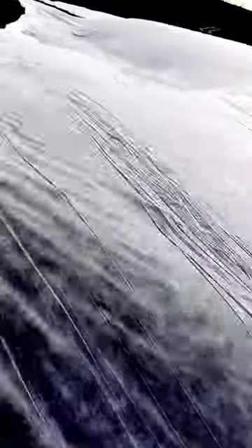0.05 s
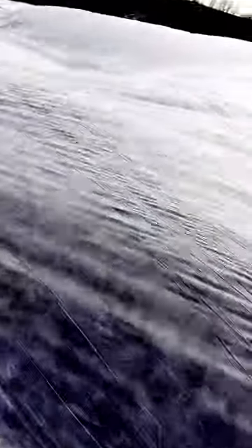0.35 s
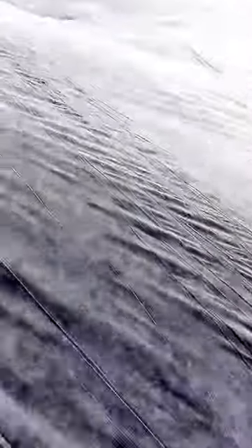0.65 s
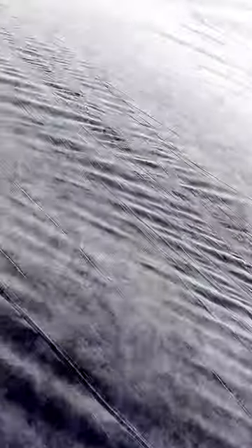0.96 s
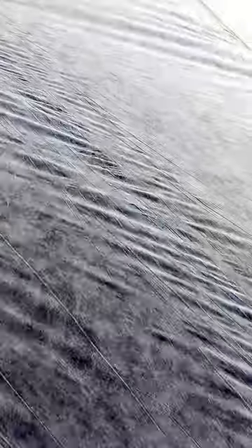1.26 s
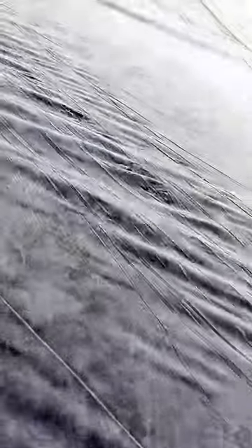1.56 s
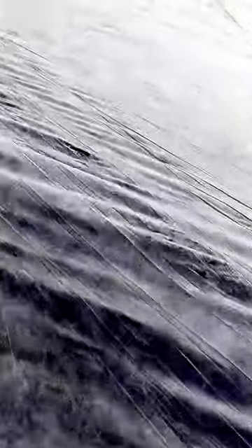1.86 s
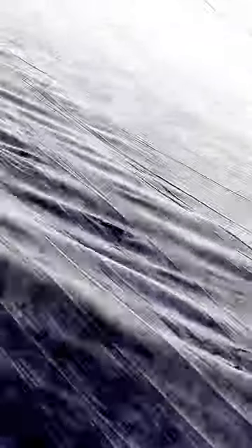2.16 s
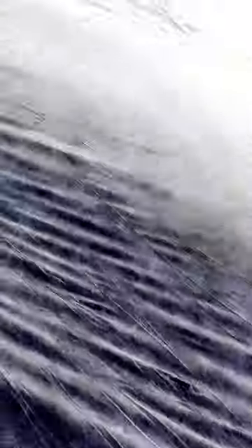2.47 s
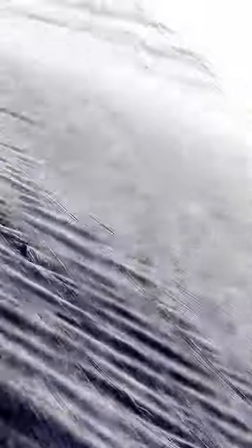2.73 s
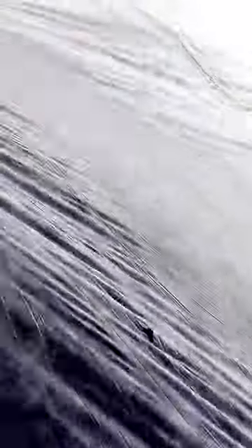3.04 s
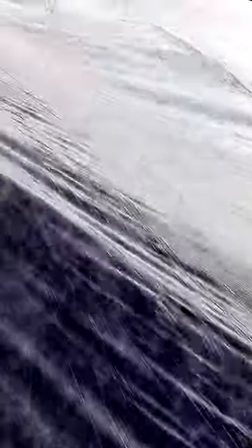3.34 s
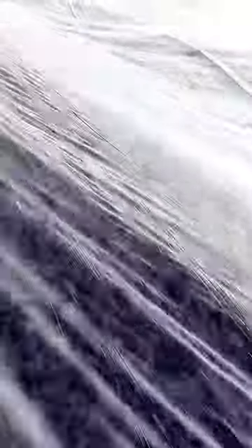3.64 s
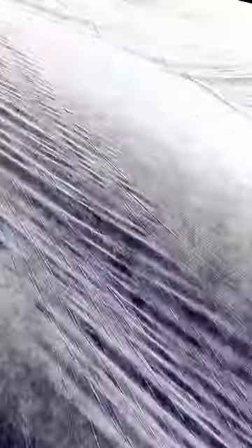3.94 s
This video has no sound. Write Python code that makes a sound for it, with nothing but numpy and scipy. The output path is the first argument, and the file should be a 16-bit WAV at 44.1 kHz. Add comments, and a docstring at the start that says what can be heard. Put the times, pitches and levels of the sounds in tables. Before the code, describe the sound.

Wind rumbles low and unevenly on the microphone for all four seconds, while a large, light fabric sheet billows close by outdoors. The cloth crumples faintly around 0.7 seconds and swishes briefly at 1.5. From there the gusts grow stronger, with short flutters and dull thumps near 1.7, 2.3 to 2.7 and 3 seconds. The loudest thump comes at about 3.6 seconds, over a very faint rustle and hiss.

```python
"""A low rumble of wind comes first, with a large, light sheet billowing close by, outdoors.
The rumble is swirling air pressing on the microphone. The wind shakes the cloth in short flurries,
and the sheet thumps as it fills and pushes the air. Now and then its folds crumple, or slide over
each other and swish. Behind it all lie a soft rustle, a faint hiss and a very faint low whistle."""
import sys
import numpy as np
from scipy import signal
from scipy.fft import rfft, irfft
from scipy.io import wavfile
from scipy.ndimage import uniform_filter1d

SR = 44100
rng = np.random.default_rng(int(sys.argv[2]) if len(sys.argv) > 2 else 0)


def store_pcm(level_fs):
    """Save levels as 16-bit WAV."""
    pcm = np.round(np.clip(level_fs, -1, 1) * 32767).astype(np.int16)
    wavfile.write(sys.argv[1], SR, np.atleast_2d(pcm).T)


N = 176400

# how hard the wind presses on the microphone: t/s, relative level/dB
WIND_LEVEL = [(0.02, -33), (0.11, -42), (0.19, -34), (0.25, -48.5), (0.37, -40.5), (0.46, -52.5),
              (0.56, -38.5), (0.61, -46), (0.64, -37.5), (0.93, -47.5), (1.02, -32.5), (1.21, -47.5),
              (1.46, -36.5), (1.5, -51), (1.57, -32), (1.62, -40.5), (1.65, -28), (1.77, -41.5),
              (1.85, -26), (1.94, -42.5), (1.98, -29), (2.09, -57.5), (2.15, -56), (2.18, -28.5),
              (2.24, -46), (2.25, -34.5), (2.36, -31.5), (2.38, -44), (2.41, -35), (2.54, -27.5),
              (2.59, -35), (2.62, -31), (2.69, -36.5), (2.73, -40.5), (2.84, -35.5), (2.97, -34.5),
              (3.04, -41), (3.09, -28), (3.15, -37), (3.19, -28), (3.21, -36), (3.26, -34), (3.29, -39.5),
              (3.31, -35.5), (3.4, -28.5), (3.45, -45), (3.51, -25), (3.56, -43.5), (3.62, -21),
              (3.67, -29.5), (3.7, -32), (3.72, -29.5), (3.88, -31.5), (3.92, -39), (3.96, -27.5)]
# tone (how strong each frequency is) of slow swirls, puffs and shaking cloth: f/Hz, relative level/dB
RUMBLE_TONE = [(10, 8.5), (22, -3), (45, 2), (70, -4), (100, -11.5), (150, -24), (220, -51.5), (400, -61.5)]
PUFF_TONE = [(40, -14), (70, -6), (110, 10), (160, -12.5), (220, -12.5), (320, -48.5), (500, -78)]
FLUTTER_TONE = [(30, -29.5), (60, -5), (110, 11), (160, -5), (230, -10), (320, -12.5), (450, -28.5),
                (700, -50), (1500, -83)]
# flurries shake the cloth: peak t/s, rise t/s, fall t/s, relative level/dB, flap pitch f/Hz
WIND_FLURRIES = [(0.111, 0.023, 0.013, -42, 109), (0.364, 0.028, 0.052, -49.5, 134),
                 (0.701, 0.0092, 0.042, -50, 122), (1.0, 0.027, 0.072, -47.5, 104),
                 (1.445, 0.012, 0.016, -34.5, 105), (1.571, 0.034, 0.02, -36.5, 102),
                 (1.68, 0.077, 0.059, -37, 98), (1.852, 0.015, 0.037, -29, 83),
                 (1.976, 0.0069, 0.02, -40, 125), (2.265, 0.06, 0.039, -40, 112),
                 (2.476, 0.033, 0.039, -31.5, 105), (2.58, 0.064, 0.07, -32.5, 116),
                 (2.86, 0.036, 0.036, -44, 81), (3.185, 0.006, 0.031, -42.5, 82),
                 (3.258, 0.0095, 0.014, -31.5, 110), (3.326, 0.016, 0.026, -31, 140),
                 (3.384, 0.0074, 0.013, -34, 119), (3.639, 0.031, 0.055, -26, 108),
                 (3.719, 0.092, 0.069, -32, 108), (3.878, 0.013, 0.019, -28, 103),
                 (3.97, 0.063, 0.04, -36.5, 88)]
# the sheet fills: t/s, peak level/dB, pitch f/Hz
SHEET_THUMPS = [(0.094, -37.5, 232), (0.253, -44.5, 240), (1.065, -27.5, 44.7), (1.124, -32.5, 102),
                (1.182, -34, 93), (1.668, -22, 104), (1.689, -23.5, 128), (1.71, -24, 121),
                (1.731, -37, 235), (1.835, -28, 170), (1.849, -30, 114), (1.971, -44, 200),
                (2.26, -22.5, 79), (2.365, -44, 182), (2.463, -22, 100), (2.54, -27.5, 125),
                (2.68, -24.5, 120), (2.987, -21.5, 71), (3.231, -47, 240), (3.313, -43, 198),
                (3.333, -51, 260), (3.387, -25.5, 109), (3.613, -29, 45), (3.635, -13, 116.6),
                (3.875, -38.5, 203)]
# folds crumple: peak t/s, rise t/s, fall t/s, relative level/dB, upper edge f/Hz
FOLD_CRUMPLES = [(0.09, 0.0024, 0.042, -56, 1690), (0.53, 0.0066, 0.007, -58, 2220),
                 (.697, 0.0069, 0.011, -55.5, 2200), (0.725, 0.0013, 0.0074, -46, 1160),
                 (0.748, 0.0016, 0.01, -47, 1320), (0.771, 0.018, 0.022, -45.5, 4360),
                 (1.235, 0.013, 0.014, -61, 1200), (1.452, 0.0012, 0.0079, -46, 468),
                 (1.505, 0.0045, 0.02, -53, 795), (2.52, 0.013, 0.01, -59, 3000),
                 (3.644, 0.012, 0.0092, -54, 600)]
# cloth slides over cloth: peak t/s, rise t/s, fall t/s, relative level/dB, zip f/Hz
CLOTH_SWISHES = [(0.098, 0.043, 0.054, -75, 3620), (0.692, 0.004, 0.0096, -64.5, 5430),
                 (1.053, 0.0026, 0.0065, -72.5, 3600), (1.517, 0.0089, 0.021, -49.5, 3440),
                 (1.532, 0.006, 0.024, -64, 2920), (2.312, 0.003, 0.0067, -72, 4200),
                 (3.641, 0.0026, 0.0035, -66.5, 3860), (3.959, .001, 0.0075, -71.5, 5200),
                 (3.994, 0.012, 0.033, -58.5, 4750)]
# tight cloth brushes lightly: peak t/s, rise and fall t/s, level/dB
CLOTH_BRUSHES = [(.525, 0.011, -71.5), (.68, 0.028, -72), (2.185, 0.033, -71.5), (3.579, 0.02, -71.5),
                 (3.711, 0.011, -69.5)]
# tone of crumpling, swishing and brushing cloth: f/Hz, relative level/dB
CRUMPLE_TONE = [(100, 12.5), (220, 5), (480, 0), (750, -2.5), (1100, -0.5), (1500, -4), (2100, -8),
                (3000, -15), (4500, -18.5), (7000, -23), (12000, -38)]
SWISH_TONE = [(300, 11.5), (600, -9.5), (1150, -15.5), (1450, 1), (2050, 2.5), (2900, 4), (4200, 1),
              (5500, -2.5), (7500, -8), (8600, -24), (14000, -30)]
BRUSH_TONE = [(1200, -1.5), (3200, -1.5), (8500, -5), (13000, -14)]
# tight cloth rubs: peak t/s, rise t/s, fall t/s, level/dB, pitch f/Hz
CLOTH_RUBS = [(.32, 0.047, 0.08, -73, 1260), (.32, 0.13, 0.1, -66, 328), (.5, 0.1, 0.076, -75.5, 1320),
              (2.22, 0.017, 0.013, -72.5, 1480), (2.412, 0.0057, 0.012, -74, 5160),
              (2.52, 0.018, 0.014, -73, 1370), (3.415, 0.0086, 0.013, -45.5, 308),
              (3.44, 0.08, .06, -76, 1150), (3.725, 0.02, 0.032, -68.5, 1133),
              (3.82, 0.011, 0.024, -72.5, 4450)]
# how loud the far cloth and the rippling surface are: t/s, level/dB
FAR_CLOTH_LEVEL = [(0, -76.5), (.33, -69.5), (.5, -74), (.62, -77), (.85, -75), (1.0, -81.5), (1.3, -76),
                   (1.68, -69.5), (2.0, -78.5), (2.22, -73.5), (2.35, -79.5), (2.5, -74), (2.7, -78),
                   (3.2, -85), (3.42, -70), (3.55, -75), (3.75, -73), (4, -81.5)]
SURFACE_LEVEL = [(0, -78), (.6, -78), (1.0, -78.5), (1.35, -75), (1.7, -75.5), (2.0, -80.5), (2.25, -77.5),
                 (2.7, -82.5), (2.8, -74.5), (2.92, -78.5), (3.3, -80.5), (4, -80.5)]
# tone of the far cloth, the rippling surface and the outdoor hiss: f/Hz, relative level/dB
FAR_CLOTH_TONE = [(200, 1), (380, -0.5), (600, -8), (900, -5.5), (1250, -8), (1800, -8), (2400, -19),
                  (5000, -40), (10000, -63)]
SURFACE_TONE = [(800, -7), (2000, -6.5), (3300, 0.5), (5000, -3), (7300, -6.5), (9000, -11.5), (14000, -28)]
AIR_TONE = [(100, 10), (300, -2.5), (550, -0.5), (1000, 11.5), (1700, 6.5), (3000, -1), (6000, 0),
            (9000, -1.5), (14000, -1.5)]
# a low whistle comes and goes: peak t/s, rise t/s, fall t/s, level/dB, pitch f/Hz
FAINT_WHISTLES = [(.98, 0.057, 0.074, -82.5, 559), (1.339, 0.071, 0.11, -81.5, 549)]

RUMBLE_DB, PUFF_DB, FLUTTER_DB, AIR_DB = 0.5, -22, -10, -75.5
RUMBLE_STEADY_S, FLUTTER_STEADY_S = 0.035, 0.055
FLAPS_PER_S, FLAP_DB, FLAP_SPREAD_DB, FLAP_SPREAD_OCTAVES = 94, 1, 0.5, 0.38
THREADS_PER_S, THREAD_SPREAD_DB = 9000, 2


def wind():
    """Slow swirls of air press on the microphone; each crest of pressure sheds a puff of faster ones."""
    slow = swirls(RUMBLE_TONE, RUMBLE_STEADY_S)
    puffs = swirls(PUFF_TONE, FLUTTER_STEADY_S) * power_of(slow) * gain(PUFF_DB)
    return (slow + puffs) * level_curve(WIND_LEVEL) * gain(RUMBLE_DB)


def flutter():
    """Fast swirls of air make each flurry sound rough."""
    power = sum((gain(db) * swell(at, rise, fall, shape=2)) ** 2
                for at, rise, fall, db, _ in WIND_FLURRIES)
    return swirls(FLUTTER_TONE, FLUTTER_STEADY_S) * np.sqrt(power) * gain(FLUTTER_DB)


def flaps(count=32):
    """In each flurry the cloth flaps to and fro at uneven times, no two flaps alike."""
    out = np.zeros(N)
    chance = rng.uniform(-0.903, 1, (len(WIND_FLURRIES), count, 3))
    for (at, rise, fall, db, hz), draws in zip(WIND_FLURRIES, chance):
        for k, (late, soft, tight) in enumerate(draws):
            offset = (k - count // 2 + late / 2) / FLAPS_PER_S
            from_peak = abs(offset) / (rise if offset < 0 else fall)
            if from_peak < 2:
                strength = gain(db + FLAP_DB - FLAP_SPREAD_DB * soft) * np.exp(-from_peak ** 2)
                pitch = hz * 2 ** (FLAP_SPREAD_OCTAVES * tight)
                out += (-1) ** k * strength * push(at + offset, pitch)  # the sign flips: to, then fro
    return out


def thumps():
    """Each time the sheet fills, it sends out one strong push of air."""
    return sum(gain(db) * push(at, hz) for at, db, hz in SHEET_THUMPS)


def crumples():
    """Creases buckle in quick showers of clicks, duller where the fold is slack."""
    creases = with_tone(clicks(per_s=3200, spread_db=4.5), CRUMPLE_TONE)
    out = np.zeros(N)
    for at, rise, fall, db, hz in FOLD_CRUMPLES:
        dulled = signal.sosfilt(signal.butter(2, hz, fs=SR, output="sos"), creases)
        out += gain(db) * swell(at, rise, fall, shape=1) * dulled
    return out


def swishes(zip_db=-4):
    """Threads slip over each other: a broad hiss, with a narrow zip while the slide is fastest."""
    hiss = with_tone(clicks(THREADS_PER_S, THREAD_SPREAD_DB), SWISH_TONE)
    out = np.zeros(N)
    for at, rise, fall, db, hz in CLOTH_SWISHES:
        speed = swell(at, rise, fall, shape=1)
        zipping = speed * gain(zip_db) * ring(hiss, hz, width_hz=280)
        out += gain(db) * speed * (hiss + zipping)
    return out


def brushes():
    """Tight cloth brushes lightly, and its slipping threads make a short, airy hiss."""
    speed = sum(gain(db) * swell(at, length, length, shape=1) for at, length, db in CLOTH_BRUSHES)
    return with_tone(clicks(THREADS_PER_S, THREAD_SPREAD_DB), BRUSH_TONE) * speed


def rubs(sharpness=5.5):
    """Slower slides of the weave make a narrow band of noise with a faint pitch."""
    slips = clicks(THREADS_PER_S, THREAD_SPREAD_DB)
    out = np.zeros(N)
    for at, rise, fall, db, hz in CLOTH_RUBS:
        width_hz = hz / sharpness
        band = ring(ring(slips, hz, width_hz), hz, width_hz)
        out += gain(db) * swell(at, rise, fall, shape=2) * band
    return out


def rustle(flicker_db=0.8):
    """The rest of the sheet stirs softly while ripples run over it; the level flickers a little."""
    far = with_tone(clicks(per_s=3000, spread_db=0.5), FAR_CLOTH_TONE) * level_curve(FAR_CLOTH_LEVEL)
    ripples = with_tone(clicks(per_s=3000, spread_db=0.5), SURFACE_TONE) * level_curve(SURFACE_LEVEL)
    return (far + ripples) * gain(flicker_db * wander(per_s=30.05))


def outdoor_air():
    """A steady outdoor hiss, in which a very faint whistle comes and goes."""
    hiss = with_tone(rng.standard_normal(N), AIR_TONE) * gain(AIR_DB)
    whistle = np.zeros(N)
    for at, rise, fall, db, hz in FAINT_WHISTLES:
        note = np.sqrt(2) * np.sin(2 * np.pi * hz * clock())
        whistle += gain(db) * swell(at, rise, fall, shape=2) * note
    return hiss + whistle


def gain(db):
    """Turn decibels into a number to multiply a sound by."""
    return 10 ** (np.asarray(db) / 20)


def clock():
    """The time of each sample in seconds."""
    return np.arange(N) / SR


def level_curve(points):
    """A gain that glides between (t/s, level/dB) points."""
    return gain(np.interp(clock(), *np.array(points).T))


def with_tone(sound, tone):
    """Shape a sound by (f/Hz, level/dB) points; its average strength (rms) comes out as 1."""
    hz, db = np.array(tone).T
    f = np.maximum(np.arange(N // 2 + 1) * SR / N, 1)
    gains = gain(np.interp(np.log(f), np.log(hz), db))
    fade_past_ends = np.minimum(f / hz[0], 1) * np.minimum(hz[-1] / f, 1) ** 2
    shaped = irfft(rfft(sound) * gains * fade_past_ends, N)
    return shaped / np.std(shaped)


def power_of(sound):
    """How much power a sound has from moment to moment."""
    return abs(signal.hilbert(sound)) ** 2 / 2


def swirls(tone, steady_s):
    """The pressure of swirling air, kept even in strength over spans longer than steady_s."""
    pressure = with_tone(rng.standard_normal(N), tone)
    return pressure / np.sqrt(smooth(power_of(pressure), int(steady_s * SR)))


def smooth(values, samples):
    """Round off quick changes by averaging neighbours, twice."""
    return uniform_filter1d(uniform_filter1d(values, samples), samples)


def clicks(per_s, spread_db):
    """Tiny clicks at random times and of uneven size."""
    ticks = (rng.random(N) < per_s / SR) * rng.choice([-1, 1], N)
    return ticks * gain(spread_db * np.clip(rng.standard_normal(N), -2, 2))


def wander(per_s):
    """A smooth random drift, mostly between -1 and 1."""
    hold = int(SR / per_s)
    steps = np.repeat(rng.standard_normal(N // hold + 1), hold)
    return np.sqrt(2) * smooth(steps, hold)[:N]


def swell(at, rise, fall, shape):
    """A rounded rise, then a quick drop with a long tail (shape 1) or a rounded fall (shape 2)."""
    t = clock() - at
    return np.exp(-np.where(t < 0, (t / rise) ** 2, abs(t / fall) ** shape))


def push(at, hz):
    """One push of air, peaking at 1, with suction just before and after it."""
    out = np.zeros(N)
    first, last = np.clip([int((at - 2 / hz) * SR), int((at + 2 / hz) * SR)], 0, N)
    phase = np.pi * hz * (np.arange(first, last) / SR - at)
    out[first:last] = (1 - 2 * phase ** 2) * np.exp(-phase ** 2)
    return out


def ring(sound, hz, width_hz):
    """Keep the band around one pitch; its average strength (rms) comes out as 1."""
    band = signal.lfilter(*signal.iirpeak(hz, hz / width_hz, fs=SR), sound)
    return band / np.std(band)


def scene():
    """Wind, cloth and outdoor air, added up in one channel."""
    billowing = wind() + flutter() + flaps() + thumps()
    cloth = crumples() + swishes() + brushes() + rubs() + rustle()
    return (billowing + cloth + outdoor_air())[None]


def record(dry):
    """Cut away the very highest treble."""
    top_hz = 14250
    return signal.sosfilt(signal.ellip(12, .1, 80, top_hz, fs=SR, output="sos"), dry)


dry = scene()
out = record(dry)
store_pcm(out)
```